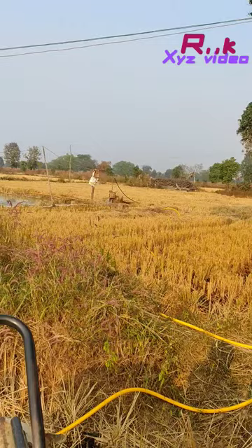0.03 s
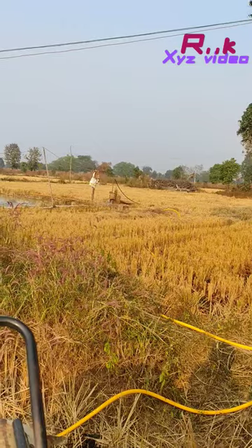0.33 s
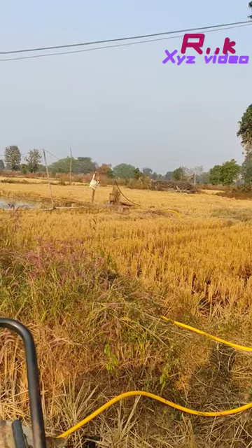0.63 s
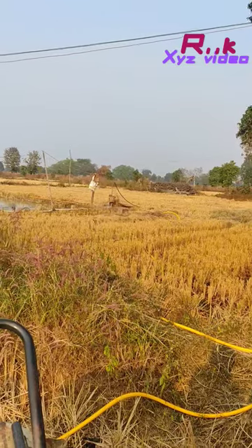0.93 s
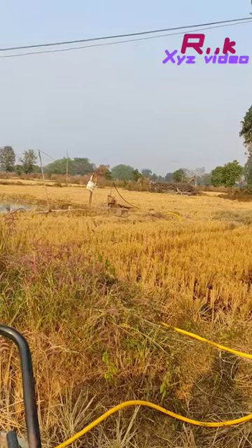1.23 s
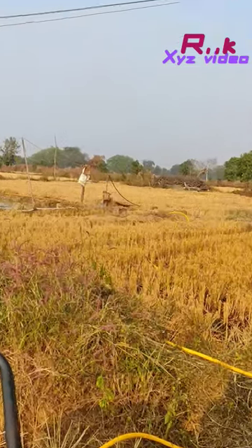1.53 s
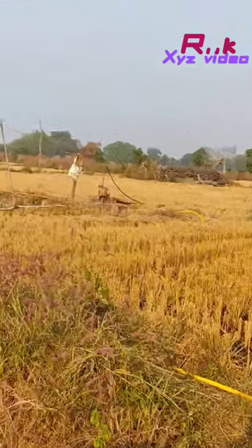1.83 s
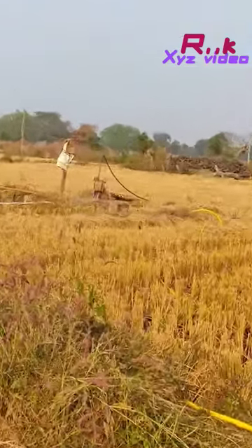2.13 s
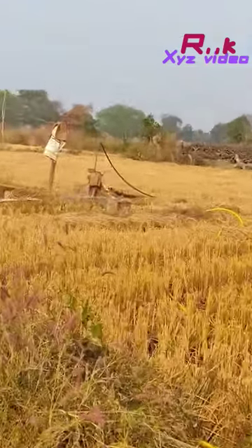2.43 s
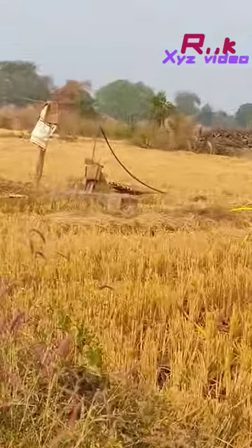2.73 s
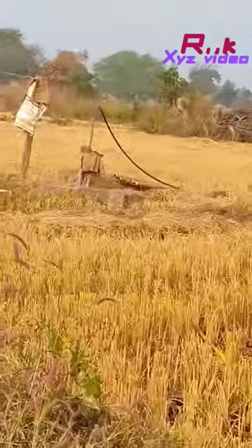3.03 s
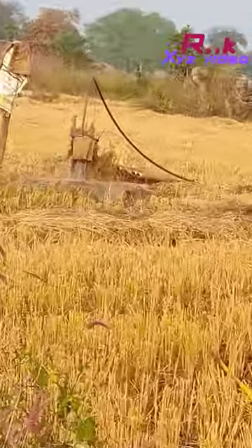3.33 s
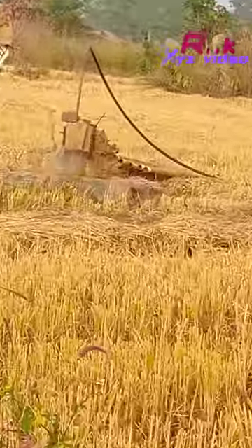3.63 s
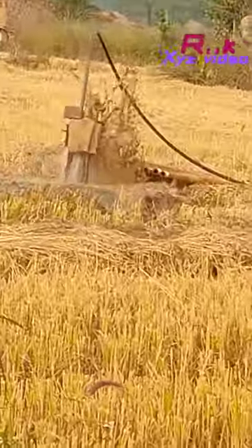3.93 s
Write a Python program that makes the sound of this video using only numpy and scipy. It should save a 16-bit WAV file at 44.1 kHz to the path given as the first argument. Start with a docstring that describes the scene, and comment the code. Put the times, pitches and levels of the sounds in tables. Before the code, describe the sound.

A diesel air compressor drones steadily close by, with metallic clatter and hissing air.

```python
"""Diesel air compressor in a field

A six-cylinder diesel runs close by at steady speed: the exhaust drones and rumbles, the block rings,
the fan hums and roars, and the gears whine and knock at the same places in every engine cycle.
The compressor clatters, and compressed air for a drill hisses and whistles, mostly on the right.
The sound fades in at the start."""
import sys
import numpy as np
from scipy import signal
from scipy.fft import rfft, irfft
from scipy.io import wavfile

SR = 44100
rng = np.random.default_rng(int(sys.argv[2]) if len(sys.argv) > 2 else 0)


def wav_out(sig):
    """Save sig, one row per channel (or a flat mono array), as 16-bit PCM at SR to the path in sys.argv[1]."""
    wavfile.write(sys.argv[1], SR, np.round(np.clip(np.atleast_2d(sig).T, -1, 1) * 32767).astype(np.int16))


N = 176400
CYCLE_HZ, CYLINDERS = 9.76, 6  # each cylinder fires once per engine cycle
TIME = np.arange(N) / SR
FREQS = np.maximum(np.arange(N // 2 + 1) * SR / N, 1)
CYCLE_PLACE = TIME * CYCLE_HZ % 1  # runs from 0 to 1 through each cycle

# low, diffuse roar of the fan: freq_hz, left_db_per_hz, right_db_per_hz
FAN_ROAR = [(200, -87, -67), (450, -65.5, -63), (800, -66.5, -67), (1500, -71, -76.5), (2300, -73, -71)]
# bright hiss of the air jet: freq_hz, left_db_per_hz, right_db_per_hz
JET_HISS = [(2780, -67, -64), (3600, -72, -65.5), (4600, -74, -67.5), (4900, -71.5, -63.5),
            (5940, -71.5, -65), (6540, -70.0, -61.5), (7500, -69.5, -58), (7980, -73, -64.5),
            (8060, -66.5, -65.5), (8660, -65.5, -66.5), (9300, -77.5, -63.5), (9700, -83.0, -61.5),
            (10500, -82.0, -62.5), (11600, -77, -62.5), (12350, -77, -64), (15100, -87.5, -69)]
# whistles in the jet: pitch_hz, width_hz, right_level_db
JET_WHISTLES = [(6710, 35, -45), (7430, 300, -39), (9360, 50, -37), (9555, 50, -33.5)]
# metallic clatter of the compressor: freq_hz, left_db_per_hz, right_db_per_hz
COMPRESSOR_CLATTER = [(400, -82, -80), (810, -63.5, -66.5), (1240, -57.5, -54.5), (1450, -57.5, -58.5),
                      (1740, -73, -57), (1860, -60, -64.5), (1900, -60.5, -61.5), (2310, -67, -62.5),
                      (2520, -62.5, -58.5), (2790, -79.5, -76.5), (3980, -75, -78.5), (8000, -100, -100)]
# ring of the engine block: freq_hz, level_db_per_hz
BLOCK_RING = [(150, -102), (210, -66.5), (250, -53), (330, -57.5), (430, -55.5), (600, -57), (690, -66.5),
              (800, -59.5), (1000, -61), (1500, -77), (3000, -86.5)]
# gear knocks within one engine cycle: place_cycles, strength_db
GEAR_KNOCKS = [(.015, -6.5), (.165, -8.5), (.22, -1.5), (.30, -9.5), (0.348, -4.5), (0.419, -9), (.467, -9),
               (.56, -6.5), (.61, 4.5), (.675, -9.5), (.755, -20.5), (.88, -8), (.96, 5.5)]
# side tones of the gear whine: pitch_cycle_harmonic, level_db
GEAR_SIDE_TONES = [(114, -36), (117, -31), (121, -41.5), (123, -44), (145, -32)]
# ring of the gear housing: freq_hz, level_db_per_hz
HOUSING_RING = [(700, -69.5), (1000, -71), (1130, -54), (1220, -50.5), (1330, -51), (1450, -55.5),
                (1600, -79), (2500, -75), (4000, -89)]
# rumble of the exhaust: freq_hz, level_db_per_hz
EXHAUST_RUMBLE = [(20, -65), (60, -58), (95, -64.5), (120, -54), (165, -52), (205, -60.5), (260, -63),
                  (500, -62.5), (1000, -70), (3000, -100)]
# strong tones of the exhaust and block: pitch_cycle_harmonic, level_db
DRONE_TONES = [(2, -46), (4, -41), (5, -47), (6, -26.5), (8, -54), (9, -39.5), (10, -42), (12, -27.5),
               (16, -39), (18, -34.5), (20, -44), (21, -43), (30, -34.5), (32, -41), (33, -45), (42, -40.5),
               (47, -42.5), (48, -41), (51, -54.5), (52, -36), (53, -48.5), (60, -43.5), (61, -38),
               (63, -46)]
# stereo balance of the engine, standing to the right: freq_hz, left_minus_right_db
ENGINE_BALANCE = [(25, -6), (60, -1.5), (90, 1), (170, -1), (290, -3), (500, -3.5), (900, -3), (1150, -8),
                  (1300, -5), (2000, 2.5)]


def from_db(db):
    """Decibels to gain."""
    return 10 ** (np.asarray(db) / 20)


def rms_one(x):
    """Scale to rms 1."""
    return x / np.sqrt(np.mean(x ** 2) + 1e-20)


def eq_curves(table):
    """Gain at every frequency, one row for each dB column of a table."""
    hz, *columns = np.transpose(table)
    return np.array([from_db(np.interp(np.log(FREQS), np.log(hz), db)) for db in columns])


def colour(noise, table):
    """Give white noise of rms 1 a spectrum in dB per Hz."""
    return irfft(rfft(noise) * eq_curves(table), N) * np.sqrt(SR / 2)


def drift(rate_hz):
    """A random wobble with spread 1, mostly slower than the given rate."""
    wobble = irfft(rfft(rng.standard_normal(N)) / (1 + (FREQS / rate_hz) ** 2), N)
    return wobble / wobble.std()


def tone(hz, db, phase_turns):
    """A sine at the given rms level."""
    return np.sqrt(2) * from_db(db) * np.sin(2 * np.pi * (hz * TIME + phase_turns))


def swell(depth_db, peak_place):
    """A gain that rises and falls once per engine cycle."""
    return rms_one(from_db(depth_db * np.cos(2 * np.pi * (CYCLE_PLACE - peak_place))))


def cyclic_noise(repeat_share):
    """White noise with a share of its power looping once per engine cycle."""
    size = int(SR / CYCLE_HZ)
    loop = rms_one(irfft(np.exp(2j * np.pi * rng.random(size // 2 + 1)), size))
    looped = np.interp(CYCLE_PLACE, np.arange(size) / size, loop, period=1)
    return np.sqrt(repeat_share) * looped + np.sqrt(1 - repeat_share) * rng.standard_normal(N)


def reflections(sound, count=6, gain=.14):
    """Panels and ground add short, weak echoes, different on each side, for a hollow colour."""
    delays_s = rng.uniform(.003, .028, (2, count))
    lags = (delays_s * SR).astype(int)
    echoes = np.array([sum(np.roll(side, lag) for lag in row) for side, row in zip(sound, lags)])
    return (sound + gain * echoes) / np.sqrt(1 + count * gain ** 2)


def from_the_right(sound, left_lag_s=.00032):
    """Place a sound to the right: the left side hears it later and, in most bands, weaker."""
    balance = eq_curves(ENGINE_BALANCE)[0]
    right = rfft(sound) * np.sqrt(2 / (1 + balance ** 2))
    left = right * balance * np.exp(-2j * np.pi * FREQS * left_lag_s)
    return irfft(np.vstack([left, right]), N)


def fan_roar_and_air_jet(flutter_db=.8, wander_db=.7, whistle_left_db=-13):
    """The fan roars under the wide hiss and breathy whistles of compressed air, all lightly fluttering."""
    air = colour(rng.standard_normal((2, N)), list(FAN_ROAR) + list(JET_HISS))
    pan = from_db([[whistle_left_db], [0]])
    for hz, width_hz, db in JET_WHISTLES:
        resonance = 1 / (1 + ((FREQS - hz) / (.93 * width_hz)) ** 2)
        whistle = rms_one(irfft(rfft(rng.standard_normal((2, N))) * resonance, N))
        air += whistle * pan * from_db(db + wander_db * drift(rate_hz=2.5))
    return air * from_db(flutter_db * drift(rate_hz=27))


def fan_hum():
    """The passing fan blades hum on one steady pitch."""
    return tone(hz=374.1, db=-36.5, phase_turns=rng.random())


def compressor_clatter(rattle_db=1.4):
    """Diffuse metallic clatter that swells once per cycle and rattles unevenly."""
    rattle = from_db(rattle_db * drift(rate_hz=90))
    envelope = rms_one(swell(depth_db=3.5, peak_place=.15) * rattle)
    noise = np.array([cyclic_noise(repeat_share=.28) for side in range(2)])
    return colour(envelope * noise, COMPRESSOR_CLATTER)


def engine_block(throb_depth=.27, peak_place=.086):
    """Combustion rings the block, much alike in every cycle, throbbing twice per firing."""
    throb = rms_one(1 + throb_depth * np.cos(2 * np.pi * 2 * CYLINDERS * (CYCLE_PLACE - peak_place)))
    return colour(cyclic_noise(repeat_share=.63) * throb, BLOCK_RING)


def gear_knocks(attack_s=.0026, decay_s=.004, scatter_db=.9):
    """Envelope of the gear knocks: the same rhythm every cycle, each hit a little different in level."""
    envelope = .25  # floor between knocks
    for place, db in GEAR_KNOCKS:
        since_s = ((CYCLE_PLACE - place + .5) % 1 - .5) / CYCLE_HZ
        falloff = np.where(since_s < 0, .5 * (since_s / attack_s) ** 2, since_s / decay_s)
        envelope += from_db(db) * np.exp(-falloff)
    return rms_one(envelope * from_db(scatter_db * drift(rate_hz=30)))


def gears(mesh_harmonic=132):
    """Each knock swells the whine of the teeth and rings the housing, which also throbs once per cycle."""
    knocks = gear_knocks()
    whine = knocks * tone(mesh_harmonic * CYCLE_HZ, db=-26, phase_turns=rng.random())
    softened = knocks ** .7  # the housing follows the knocks only in part
    shake = rms_one(softened * swell(depth_db=2.2, peak_place=.36))
    side_tones = sum(tone(harmonic * CYCLE_HZ, db, rng.random()) for harmonic, db in GEAR_SIDE_TONES)
    housing = colour(shake * cyclic_noise(repeat_share=.43), HOUSING_RING)
    return whine + shake * side_tones + housing


def exhaust_rumble():
    """A loose bed of low noise from the exhaust."""
    return colour(rng.standard_normal(N), EXHAUST_RUMBLE)


def exhaust_drone(waver_depth=.054):
    """The silencer delays high tones more than low ones, smearing the firings into a drone."""
    drone = np.zeros(N)
    for harmonic, db in DRONE_TONES:
        lag_turns = (harmonic / CYLINDERS / 2) ** 2
        waver = 1 + waver_depth * drift(rate_hz=7)
        drone += tone(harmonic * CYCLE_HZ, db, -lag_turns) * waver
    return drone


def scene():
    """The engine sits to the right, with the clatter, fan roar and air jet spread wide around it."""
    engine = fan_hum() + exhaust_drone() + engine_block() + exhaust_rumble() + gears()
    return from_the_right(engine) + reflections(compressor_clatter() + fan_roar_and_air_jet())


def record(dry, start_s=.12, fade_s=.35, start_gain=.069, cutoff_hz=14200):
    """Fade in after a moment of silence and cut the top end steeply."""
    fade_left = np.clip(1 - (TIME - start_s) / fade_s, 0, 1) ** 1.94
    fade = (TIME > start_s) * (1 - (1 - start_gain) * fade_left)
    lowpass = signal.ellip(12, .1, 90, cutoff_hz, fs=SR, output="sos")
    return signal.sosfilt(lowpass, dry * fade)


dry = scene()
out = record(dry)
wav_out(out)
```